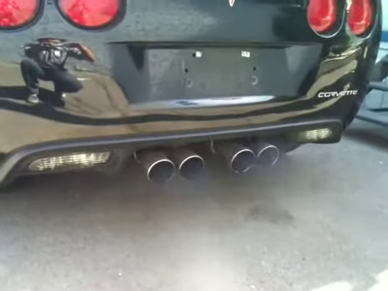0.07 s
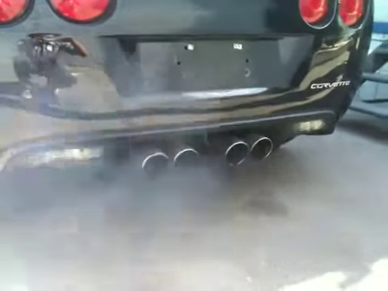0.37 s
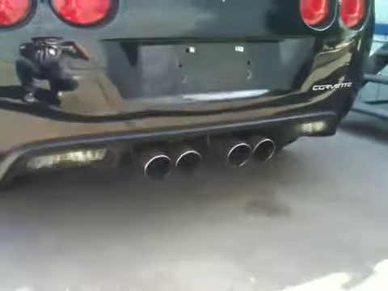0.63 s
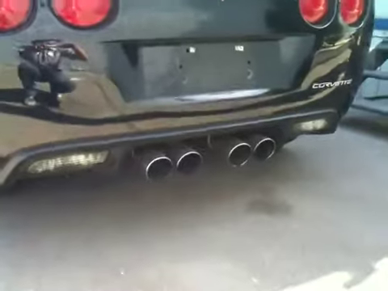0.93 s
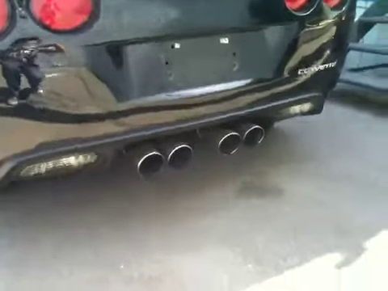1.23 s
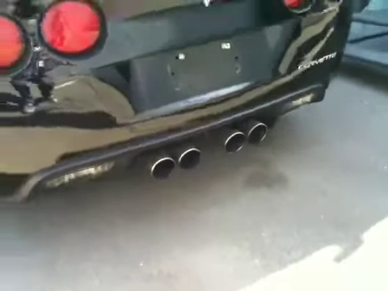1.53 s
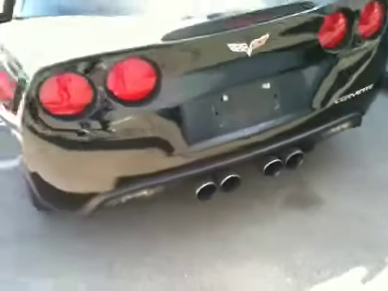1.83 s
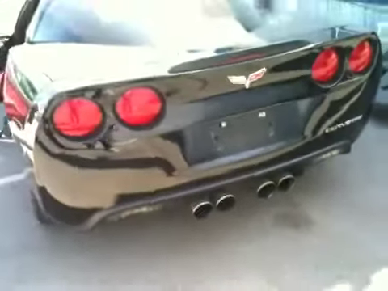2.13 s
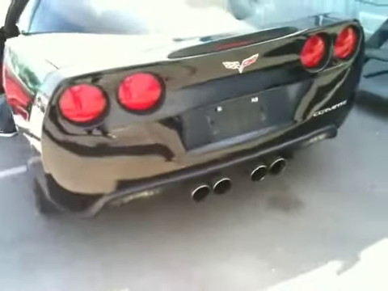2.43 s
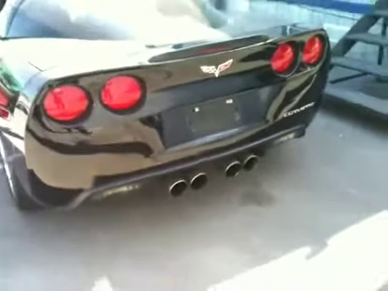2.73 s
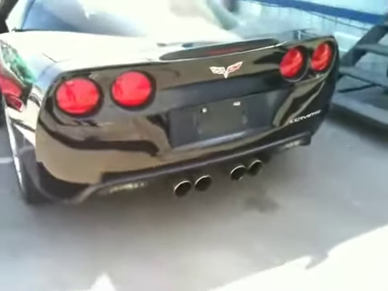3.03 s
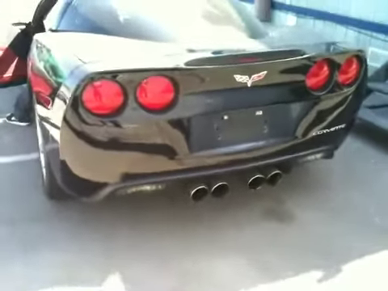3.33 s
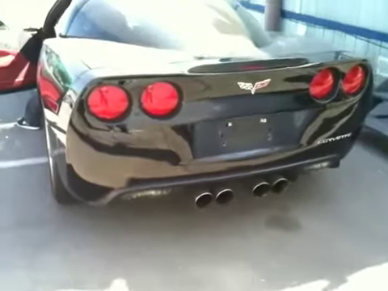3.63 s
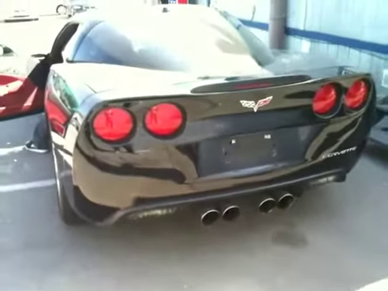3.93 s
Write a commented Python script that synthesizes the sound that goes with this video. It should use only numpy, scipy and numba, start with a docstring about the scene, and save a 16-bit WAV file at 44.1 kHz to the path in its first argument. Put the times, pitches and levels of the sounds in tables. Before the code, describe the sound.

A V8 sports car revs once, outdoors, close behind the tailpipes. In the first 0.3 seconds the pitch shoots up with a crackling bark and rushing gas, overloading the microphone. The drone then slides steadily down, with a dull pop at 0.7 seconds, growing quieter after 1.5. Soft pops come around 2.9 to 3.3 seconds, and it reaches a low burbling idle under engine whirr by 4 seconds.

```python
"""Outdoors, close behind the tailpipes of a V8 sports car whose throttle is blipped once.
The exhaust barks and crackles as the revs shoot up. As they fall, the harmonics of the firing cycle
drone down through the pipe resonances, with dull afterfire pops, to a burbling idle under the whirr
of the engine. Turbulent gas rushes from the pipes, and the loud part overloads the microphone."""
import sys
import numpy as np
from scipy import signal
from scipy.fft import rfft, irfft
from scipy.io import wavfile
from scipy.ndimage import map_coordinates
from numba import njit

SR = 44100
rng = np.random.default_rng(int(sys.argv[2]) if len(sys.argv) > 2 else 0)


def waveform_to_disk(signal):
    """Save audio, clipped to [-1, 1], as 16-bit WAV at the path in sys.argv[1]."""
    frames = np.transpose(np.atleast_2d(signal))
    scaled = np.clip(frames, -1, 1) * 32767
    samples = np.round(scaled).astype(np.int16)
    wavfile.write(sys.argv[1], SR, samples)


N = 176400

# crank speed: t/s, speed/rpm
CRANK_SPEED = [(0, 3182), (.05, 3355), (.1, 3753), (.15, 4158), (.25, 4645), (.33, 4500), (.4, 4450),
               (.5, 4241), (.75, 3711), (1, 3392), (1.25, 2985), (1.5, 2671), (1.8, 2366), (2.1, 2063),
               (2.5, 1764), (2.9, 1508), (3.3, 1209), (3.6, 1041), (4, 893.7)]
# exhaust strength: t/s, drone level ahead of the pipes/dB, burble level/dB
EXHAUST_LEVELS = [(0, -1, -1.5), (.06, 4, -15), (.13, -0.5, -9), (.27, -8, -8), (.4, -1.5, -12),
                  (.6, 0, -9.5), (.75, 1.5, -18.5), (1.1, -3.5, -15), (1.35, -2.5, -19), (1.65, -12, -19.5),
                  (1.9, -10.5, -21.5), (2.25, -17.5, -24.5), (2.5, -21, -30), (2.85, -23.5, -33.5),
                  (3.25, -24.5, -31.5), (3.35, -12.5, -32), (3.65, -14.5, -35.5), (4, -22.5, -37)]
# resonant response of the exhaust pipes: f/Hz, gain/dB
PIPE_RESPONSE = [(30, -64), (60, -48), (95, -33), (112, -22), (132, -9), (155, -10), (178, -2), (194, -5),
                 (208, 3), (224, 1), (238, -13), (248, -13), (268, 3), (286, -4), (305, -3), (360, -9),
                 (430, -16), (520, -15), (600, -12), (720, -18), (1100, -30), (2500, -54)]
# broadband noise: t/s, gas rush level/dB, engine whirr level/dB
NOISE_LEVELS = [(0, -16, -42), (.05, -11, -44), (.12, -7, -44), (.3, -12.5, -42), (.7, -17, -37.5),
                (1.2, -24, -36), (1.6, -30, -36.5), (2, -36.5, -37), (2.5, -45.5, -39.5),
                (2.95, -46.5, -41.5), (3.5, -56.5, -45.5), (4, -49, -47.5)]


def firing_count():
    """Four-stroke cycle: eight cylinders fire four times a crank turn. Returns the running count."""
    speed_wobble, jitter_intervals = .0025, .014
    firing_hz = curve(CRANK_SPEED) * 4 / 60 * (1 + speed_wobble * walk(25))
    return np.cumsum(firing_hz) / SR + jitter_intervals * walk(130)


def drone(firings, step=16):
    """Source and filter: periodic cylinder pulses form a harmonic series shaped by pipe resonances."""
    # cycle harmonics: multiple, level on throttle/dB, level on overrun/dB, level near idle/dB
    harmonics = [(4, -13, -7.5, -15), (5, 2.5, -18.5, -9), (6, -5.5, -1, 1), (7, -11.5, -24, -31),
                 (8, 1, -2, 6.5), (9, -6, -14.5, -4), (10, -33, -19.5, -23), (11, -22, -20, -7),
                 (12, -23, -20, -12), (14, -25, -17.5, -20), (16, -4.5, -10, -1.5), (18, -20, -14, -22),
                 (20, -22, -9.5, -23), (24, 3, -15, -10), (32, -19, -20, -23.5)]
    # lope, the tones between the harmonics of the firing rate: t/s, gain/dB
    lope = [(0, -26), (.07, -5.5), (.15, 0.5), (.25, 4.5), (.45, -3), (.62, -10), (.8, 2), (1, 3),
            (1.1, -2), (1.35, -1.5), (1.65, 1.5), (2.3, -4), (2.9, 6), (3.5, -12)]
    cycle = firings[::step] / 8  # low tones need only a reduced sample rate
    lifted = fade(at_s=.2888, length_s=.022)[::step]  # the throttle closes
    idling = fade(at_s=2.316, length_s=.99)[::step]
    lope_db, flicker_db = curve(lope)[::step], 2.32
    pressure = np.zeros(len(cycle))
    for multiple, throttle_db, overrun_db, idle_db in harmonics:
        flicker = np.interp(cycle, np.arange(256), rng.standard_normal(256))
        db = throttle_db + lifted * (overrun_db - throttle_db) + idling * (idle_db - overrun_db)
        db += lope_db * (multiple % 8 > 0) + flicker_db * flicker
        pressure += undb(db) * np.sin(2 * np.pi * (multiple * cycle + rng.random()))
    source = signal.resample_poly(pressure, step, 1)[:N] * undb(curve(EXHAUST_LEVELS))
    return colour(source, PIPE_RESPONSE)


def burble(firings):
    """Impulse excitation: each firing is a little too strong or weak and rings the pipes by that much."""
    onsets = np.diff(np.floor(firings), prepend=0)
    knocks = onsets * rng.standard_normal(N) / np.sqrt(curve(CRANK_SPEED))
    ringing = muffler(colour(knocks, PIPE_RESPONSE), top_hz=432)
    return unit(ringing) * undb(curve(EXHAUST_LEVELS, column=2))


def cracks():
    """Combustion noise: gas burns in the pipes in short ragged bursts as the throttle opens."""
    # bursts: t/s, time until the decay begins/s, level/dB
    bursts = [(0.059, 0.026, -2.5), (0.107, 0.0076, -4), (0.123, 0.018, -7.5), (0.149, 0.003, 0.5),
              (0.167, 0.0053, -5.5), (0.183, 0.0044, -3), (.209, 0.0053, 0.5), (0.231, 0.009, -6.5),
              (.265, 0.0045, -10), (0.307, 0.0045, -13.5), (0.339, 0.0039, -14)]
    # spectrum of the burning gas: f/Hz, relative density level/dB
    spectrum = [(60, -18.5), (300, 12.5), (700, 3), (1400, 1.5), (2600, -3.5), (4000, -18), (8000, -25.5),
                (15500, -30.5)]
    attack_s, decay_s = .0018, .0059
    t, envelope = np.arange(N) / SR, np.zeros(N)
    for start, length, db in bursts:
        rise = np.clip((t - start) / attack_s, 0, 1)
        decay = np.exp(-np.maximum(t - start - length, 0) / decay_s)
        envelope += undb(db) * rise * decay
    return envelope * noise(spectrum)


def afterfire(size=8192):
    """Transient response: late-burning charges thump the pipe resonances as the revs fall."""
    # pops: t/s, peak level/dB
    pops = [(.695, -5.5), (2.85, -17.5), (2.936, -16.5), (3.122, -19.5), (3.287, -21), (3.87, -26)]
    decay_s = .014
    out = np.zeros(N + size)
    for start, db in pops:
        burst = rng.standard_normal(size) * np.exp(-np.arange(size) / SR / decay_s)
        thump = muffler(colour(burst, PIPE_RESPONSE), top_hz=346)
        i = int(start * SR)
        out[i:i + size] += undb(db) * thump / np.abs(thump).max()
    return out[:N]


def gas_rush(firings):
    """Jet noise: turbulent gas leaves the tailpipes, swelling slightly in a puff at each firing."""
    # jet spectrum: f/Hz, relative density level/dB
    spectrum = [(30, -29), (90, -9.5), (300, -3), (600, 7), (950, -1), (1300, -7.5), (2200, -8),
                (3200, -16), (5000, -21.5), (8500, -33.5), (11500, -32), (15500, -43)]
    puff_share = .1
    strength = undb(rng.standard_normal(N))[firings.astype(int)]  # puffs scatter by 1 dB
    puffs = unit(strength * np.exp(-(firings % 1)))
    turbulence = rng.standard_normal(N) * (1 - puff_share + puff_share * puffs)
    return unit(colour(turbulence, spectrum)) * undb(curve(NOISE_LEVELS))


def whirr():
    """Broadband machine noise: belts, fan and valve gear hiss from the front of the car."""
    # machinery spectrum: f/Hz, relative density level/dB
    spectrum = [(150, -16), (380, -2.5), (480, 3), (640, -8), (840, 6), (1150, -5.5), (1600, -8),
                (2100, -8), (2480, -8), (3000, -13), (3380, -13), (3570, -10), (3800, -15.5), (4300, -17),
                (4720, -14), (5050, -17.5), (5450, -17.5), (7000, -27.5), (9000, -33.5), (12000, -36),
                (15500, -39.5)]
    return noise(spectrum) * undb(curve(NOISE_LEVELS, column=2) + .23 * walk(40))


def muffler(x, top_hz):
    """Acoustic low-pass: the muffler rounds off sharp knocks."""
    return signal.sosfilt(signal.butter(4, top_hz, fs=SR, output="sos"), x)


def colour(x, response, size=16384):
    """Minimum-phase filtering by a response given as f/Hz, gain/dB."""
    hz, db = np.array(response).T
    freqs = np.maximum(np.arange(size // 2 + 1) * SR / size, 1)
    gain = undb(np.interp(np.log(freqs), np.log(hz), db))
    cepstrum = irfft(np.log(gain))
    cepstrum[1:size // 2] *= 2  # folding onto positive time makes the filter causal
    cepstrum[size // 2 + 1:] = 0
    impulse_response = irfft(np.exp(rfft(cepstrum)))
    return signal.fftconvolve(x, impulse_response)[:len(x)]


def noise(spectrum):
    """Spectral shaping of white noise, at rms 1."""
    return unit(colour(rng.standard_normal(N), spectrum))


def walk(rate_hz):
    """Smooth random wander of rms 1: a spline through random knots."""
    steps = np.arange(0, N + 32, 32) * rate_hz / SR
    spline = map_coordinates(rng.standard_normal(4096), [steps], order=3, mode="wrap")
    return unit(np.interp(np.arange(N) / 32, np.arange(len(steps)), spline))


def curve(table, column=1):
    """Linear interpolation of a time table at every sample."""
    rows = np.array(table)
    return np.interp(np.arange(N) / SR, rows[:, 0], rows[:, column])


def fade(at_s, length_s):
    """A linear ramp from 0 to 1 centred on a moment."""
    return np.clip((np.arange(N) / SR - at_s) / length_s + .5, 0, 1)


def undb(db):
    """Decibels to amplitude ratio."""
    return 10 ** (np.asarray(db) / 20)


def unit(x):
    """Normalisation to rms 1."""
    return x / np.sqrt(np.mean(x ** 2))


@njit
def follow_peaks(x, attack_s, release_s):
    """Envelope detection: the rectified signal is smoothed, quickly up and slowly down."""
    out, envelope = np.empty(len(x)), 0.
    for i in range(len(x)):
        rectified = abs(x[i])
        lag_s = attack_s if rectified > envelope else release_s
        envelope += (rectified - envelope) / (lag_s * SR)
        out[i] = envelope
    return out


def scene():
    """Superposition of exhaust and engine in one channel; drone, burble and rush share the firings."""
    firings = firing_count()
    return (drone(firings) + burble(firings) + gas_rush(firings) + whirr() + cracks() + afterfire())[None]


def record(dry):
    """Overload: a limiter holds the level, peaks that slip past saturate, and the band edges are cut."""
    threshold, ceiling, knee = .84, .72, 5.0
    low_cut_hz, top_hz = 60, 15700
    envelope = follow_peaks(dry[0], attack_s=.005, release_s=.15)
    held = dry / np.maximum(envelope / threshold, 1)
    saturated = held / (1 + np.abs(held / ceiling) ** knee) ** (1 / knee)
    bass_cut = signal.sosfilt(signal.butter(2, low_cut_hz, "high", fs=SR, output="sos"), saturated)
    return signal.sosfilt(signal.ellip(10, .1, 80, top_hz, fs=SR, output="sos"), bass_cut)


dry = scene()
out = record(dry)
waveform_to_disk(out)
```